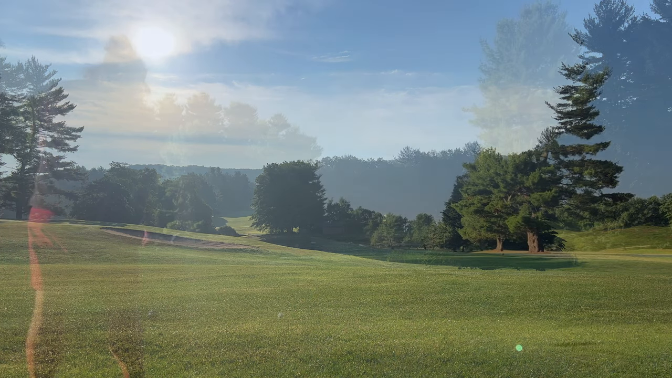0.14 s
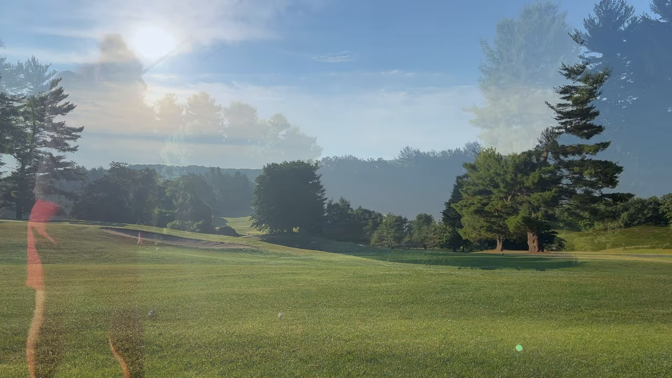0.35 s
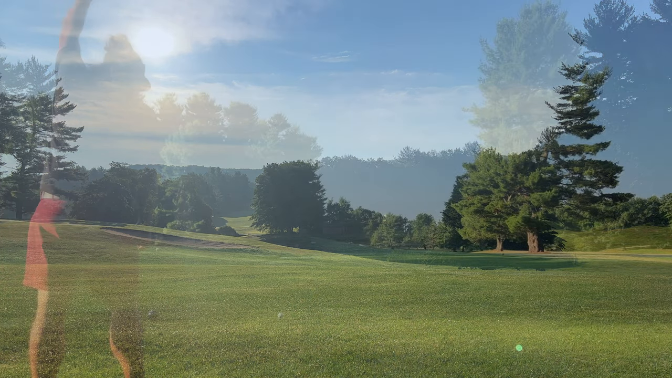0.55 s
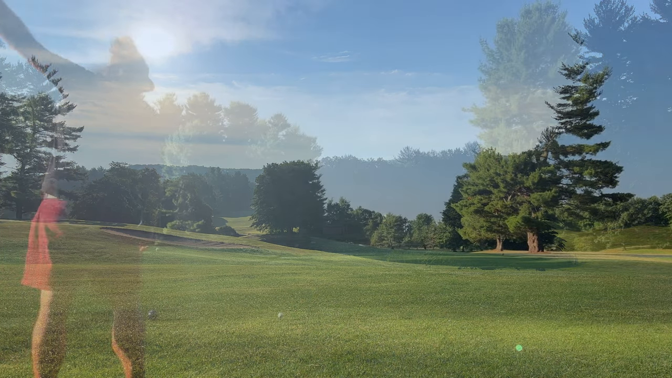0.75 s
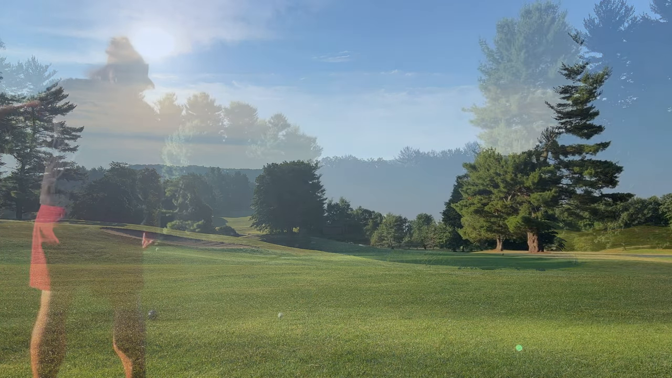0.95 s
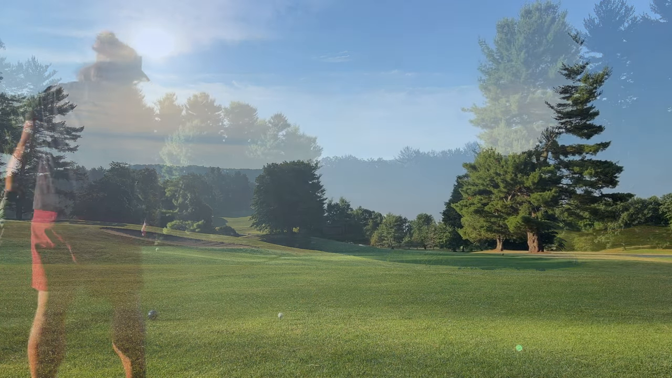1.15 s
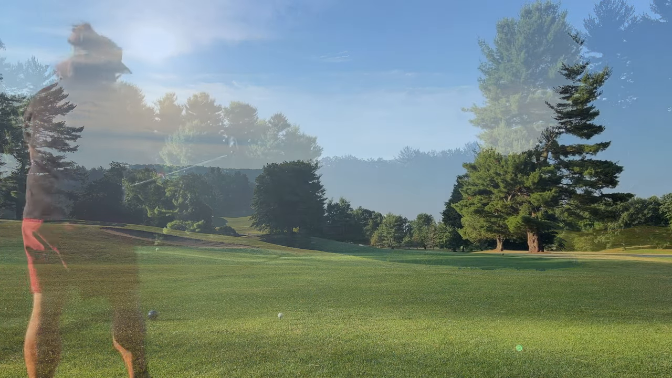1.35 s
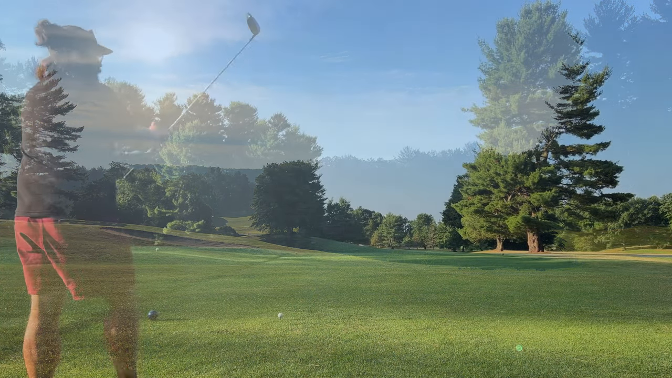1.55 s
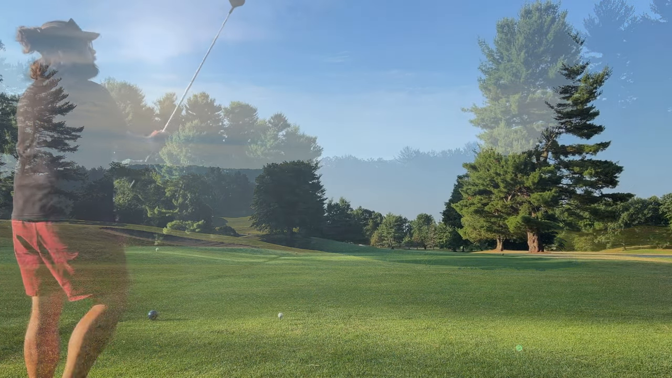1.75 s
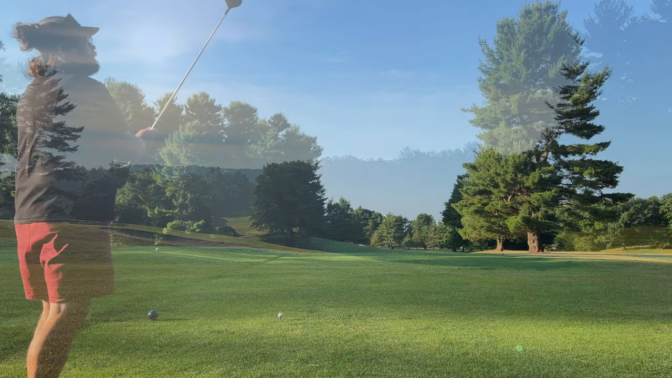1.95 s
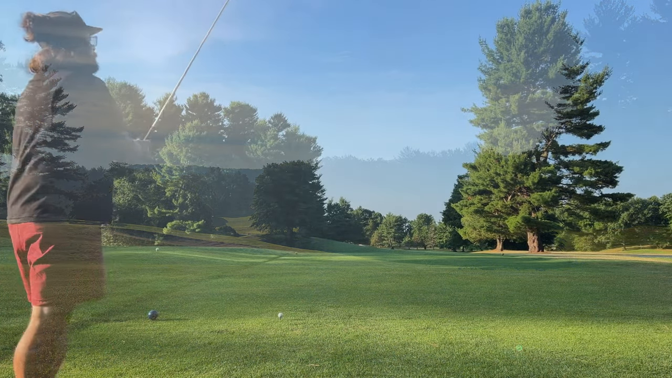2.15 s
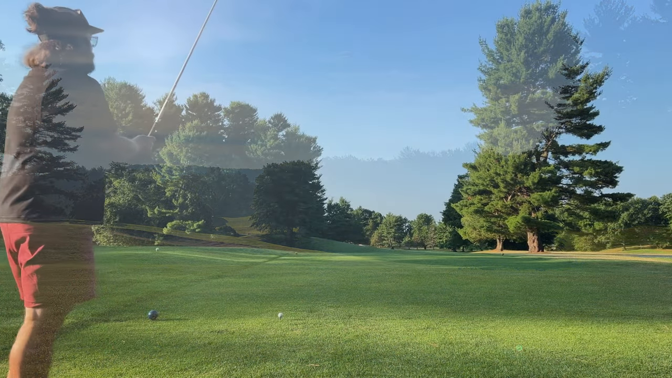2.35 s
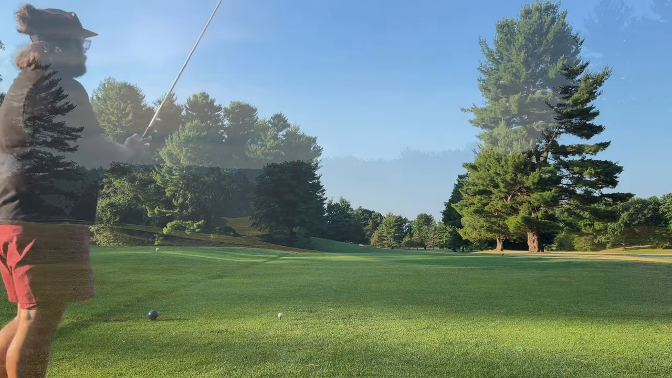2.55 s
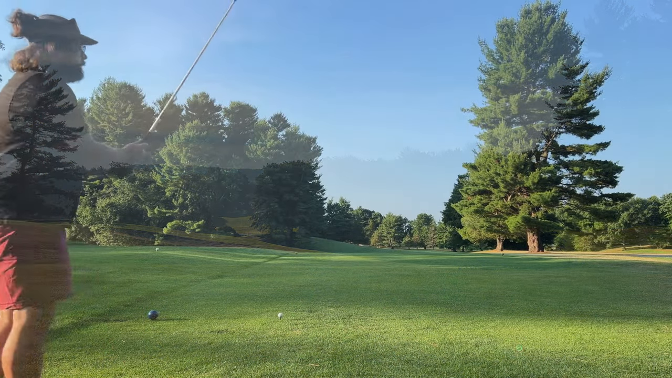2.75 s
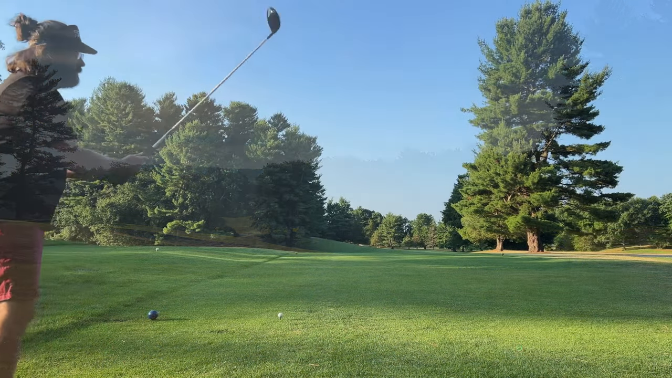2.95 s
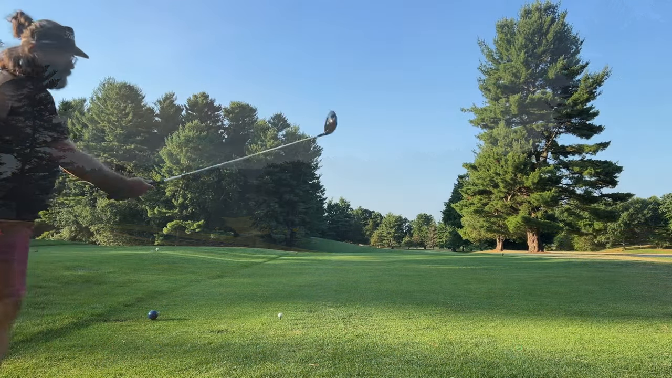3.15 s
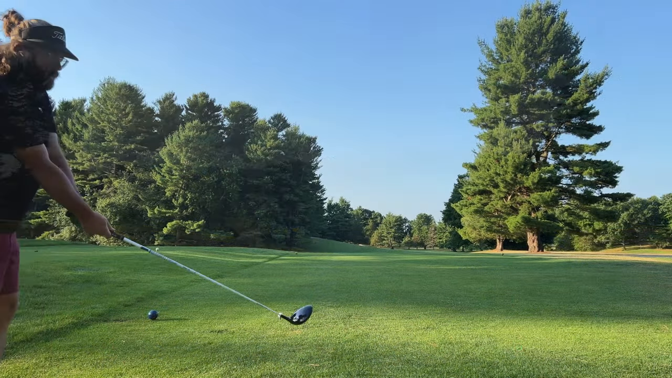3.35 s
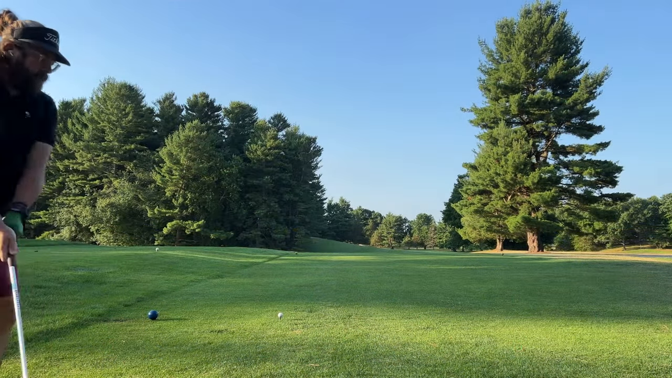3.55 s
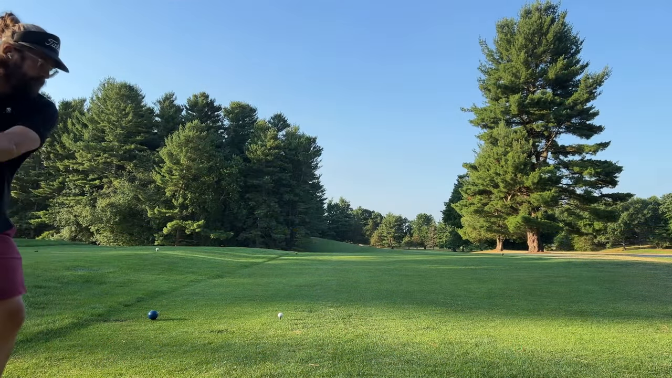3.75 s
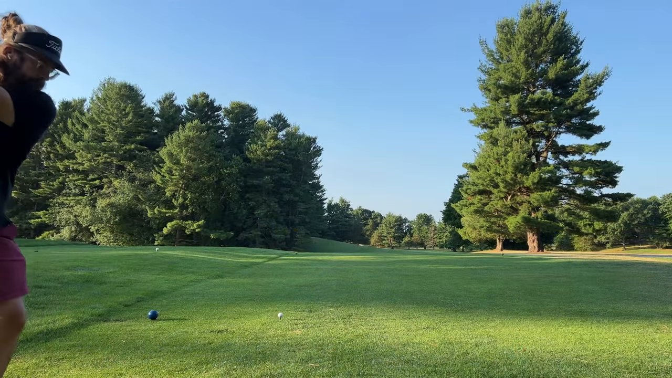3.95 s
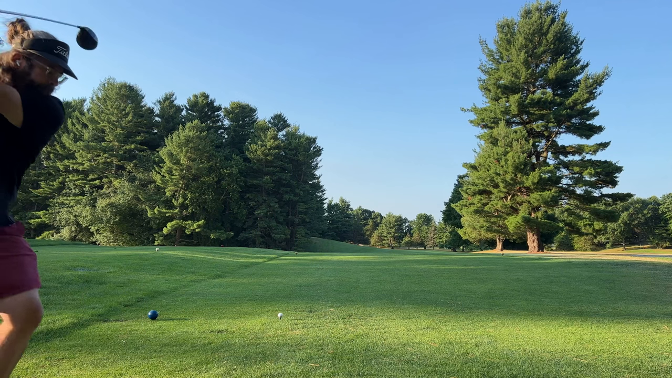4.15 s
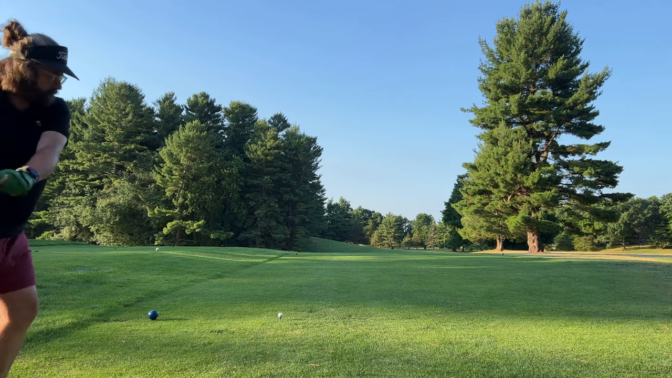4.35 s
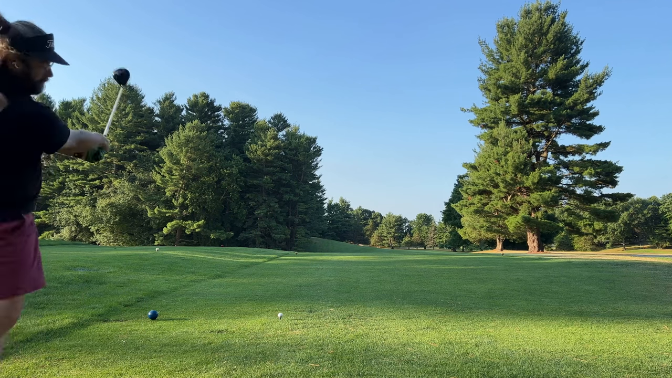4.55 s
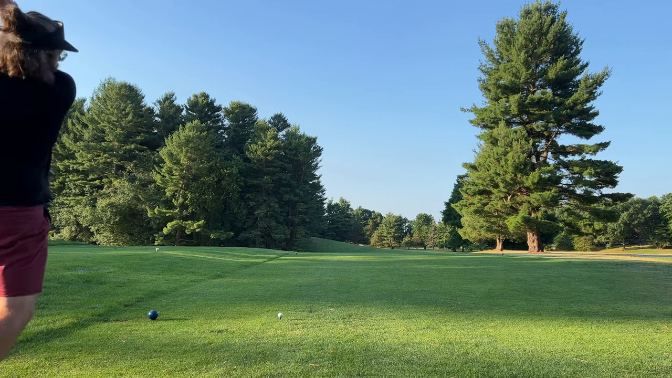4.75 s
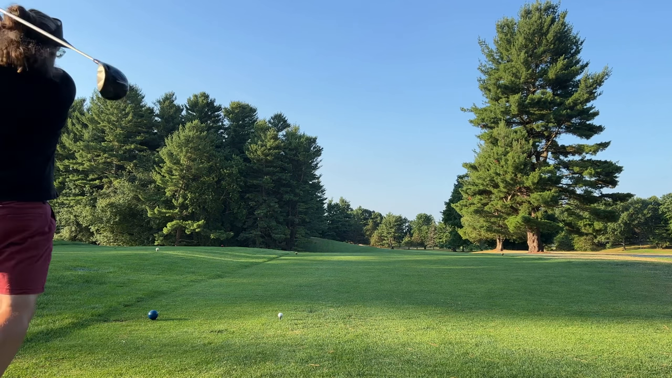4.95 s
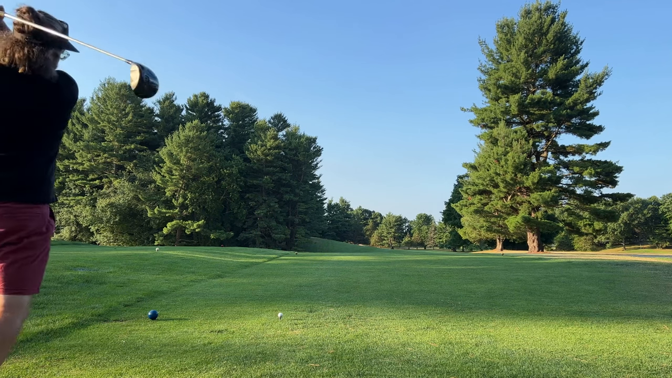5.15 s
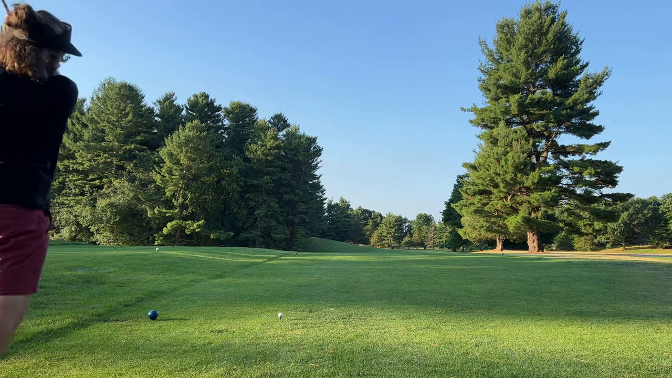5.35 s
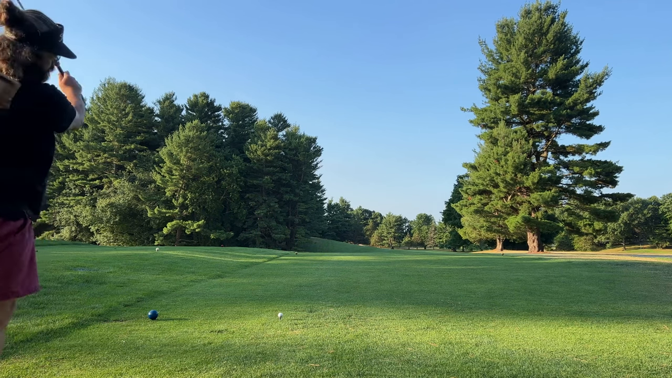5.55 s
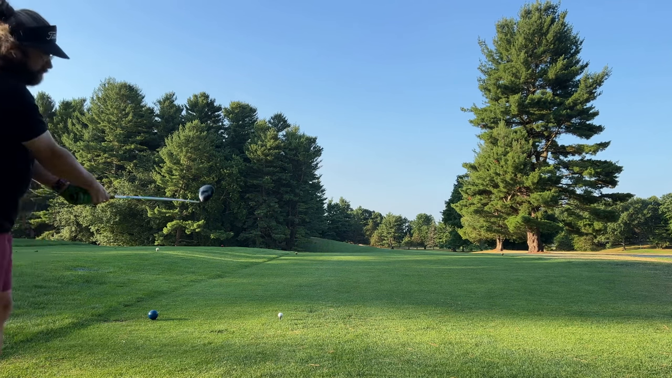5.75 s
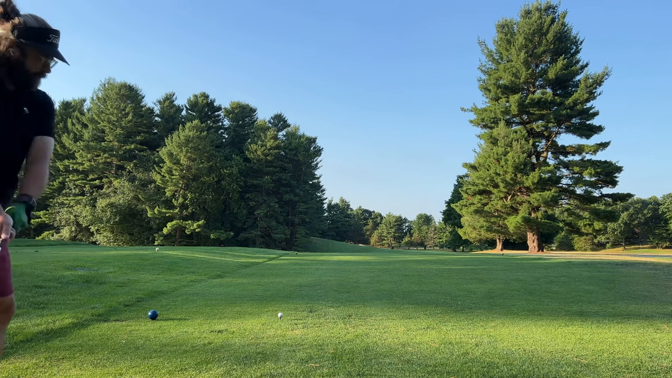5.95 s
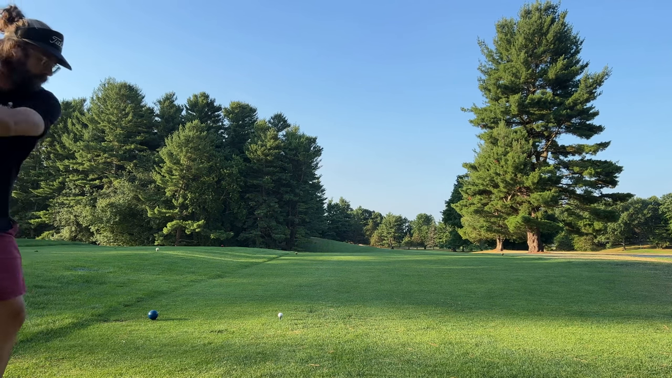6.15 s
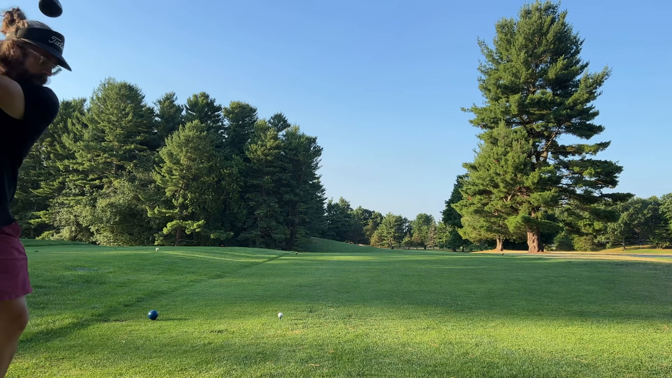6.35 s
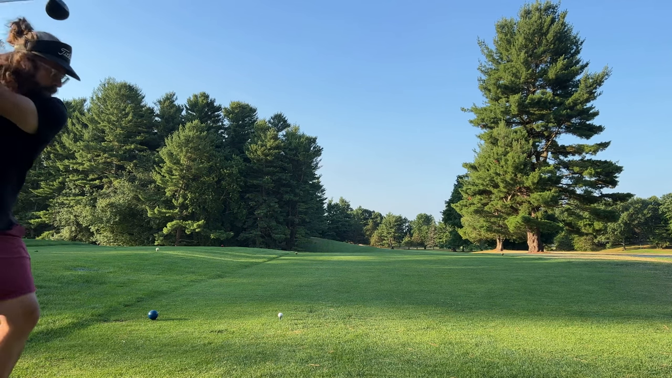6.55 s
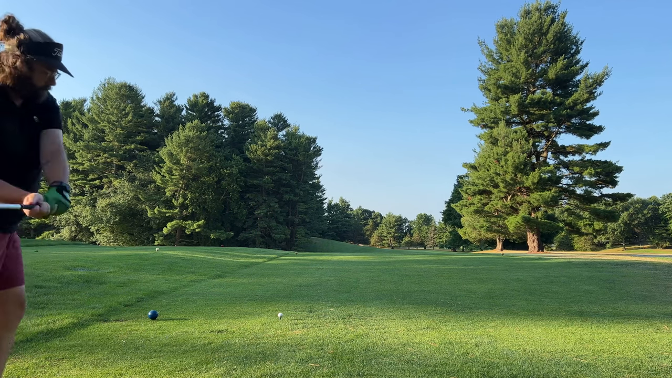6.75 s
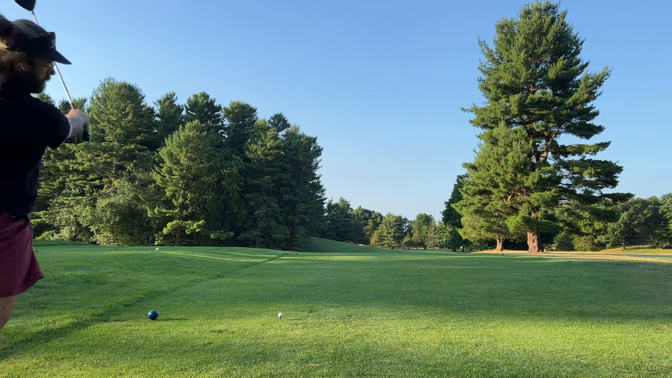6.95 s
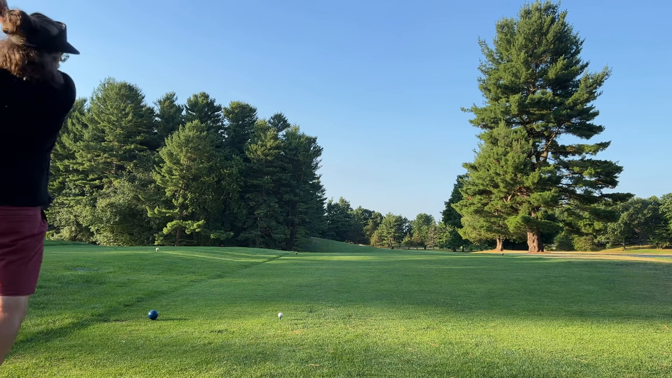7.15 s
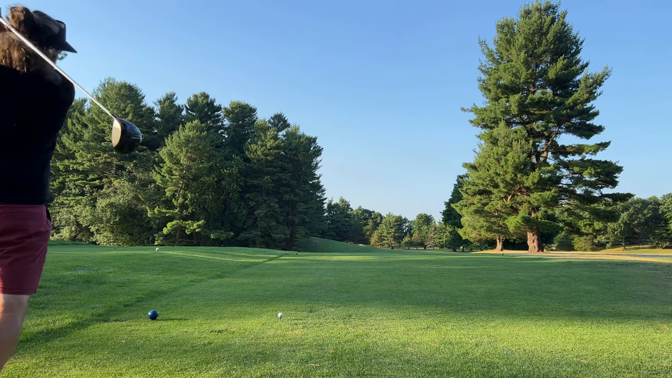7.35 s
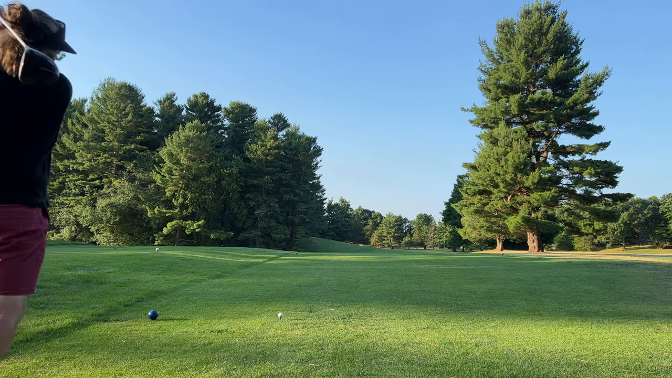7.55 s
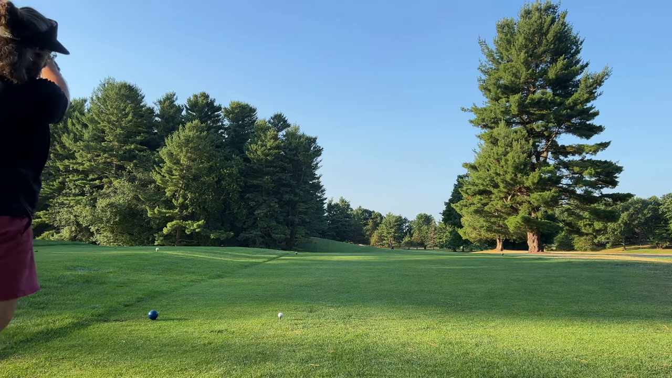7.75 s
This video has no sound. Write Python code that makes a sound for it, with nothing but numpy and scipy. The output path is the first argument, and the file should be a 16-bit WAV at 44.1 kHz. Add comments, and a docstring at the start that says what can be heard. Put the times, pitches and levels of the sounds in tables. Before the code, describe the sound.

A golf driver whooshes past twice, grazing grass hard then barely, amid low wind rumble on the microphone, small birds and insects.

```python
"""A golf driver is swung twice, a step or two left of a phone, and brushes the turf, hard and then barely.
The shaft sheds vortices whose Aeolian tone rises with its speed; the head leaves a hissing wake and whistles.
Light wind thumps on the microphone ports as short pressure pulses; cloth or shoes rustle close by.
Songbirds whistle and buzz among echoing trees, over noise bands of far traffic, leaves and insects.
A far motor hums at first as a few wavering lines and fades out."""
import sys
import numpy as np
from scipy import signal
from scipy.fft import rfft, irfft, next_fast_len
from scipy.io import wavfile
from scipy.ndimage import uniform_filter1d

SR = 44100
rng = np.random.default_rng(int(sys.argv[2]) if len(sys.argv) > 2 else 0)


def pcm_store(signal):
    """Save signal as 16-bit PCM."""
    levels = np.round(np.clip(np.atleast_2d(signal), -1, 1) * 32767)
    wavfile.write(sys.argv[1], SR, levels.astype(np.int16).T)


N = 347949
TIME = np.arange(N) / SR

# spectrum of traffic, leaves and insects: frequency_hz, relative_density_db
AIR_SPECTRUM = [(88, -20), (150, -3.5), (217, -3.5), (239, -1.5), (274, -6), (462, -9.5), (509, -9.5),
                (550, -7.5), (695, -8), (1150, -12), (1750, -19), (2500, -27), (3910, -29.5), (7130, -40.5),
                (7860, -41), (10100, -60), (15500, -60)]
# correlation of left and right in the air: frequency_hz, correlation (-1 to 1)
AIR_CORRELATION = [(60, 0.79), (130, 0.51), (290, 0.3), (640, -0.63), (1410, -0.15), (3100, 0.23),
                   (6820, -0.059), (15000, 0.88)]
# balance of the air: frequency_hz, left_minus_right_db
AIR_BALANCE = [(60, -2), (110, -4), (200, 1.5), (380, 1), (700, -0.5), (1290, 2.5), (2380, 3), (4400, 3.5),
               (8120, 4.5), (15000, -2.5)]
# low mids of the traffic: time_s, level_db
TRAFFIC_LEVEL = [(0, -52.5), (1.3, -52), (1.8, -54.5), (4.5, -54.5), (7.89, -55)]
# the traffic's rush near 1.6 kHz against its low mids: time_s, relative_db
TRAFFIC_RUSH = [(0, 2), (1, 2.5), (2.4, 2), (3.2, 1), (6.5, 0.5), (7.89, -3)]
# hiss of the leaves: time_s, level_db
LEAVES_LEVEL = [(0, -66.5), (.72, -67.5), (1.2, -67.5), (2.04, -64), (2.66, -65.5), (3.1, -70), (3.5, -73),
                (4.2, -72.5), (4.62, -62), (4.9, -69), (5.19, -71), (5.8, -64.5), (6.24, -70.5),
                (6.94, -65.5), (7.34, -73), (7.71, -72.5), (7.89, -65)]
# highest hiss against the leaves: time_s, relative_db
TOP_HISS = [(0, -11), (2.6, -20.5), (3.3, -14), (7.89, -14.5)]
TREBLE_FLICKER_DB, TREBLE_FLICKER_HZ = 1.3, 220  # fast random level flicker of the treble bands
AIR_FLICKER_DB = 1.1

# lines of the far motor: pitch_hz, width_hz, rms_level_db, fade_start_s, gone_s
MOTOR_LINES = [(113, 2.5, -45, 2.35, 3.45), (246, 2.5, -52, .35, 1.35), (494, 2, -62, .7, 1.2),
               (1980, 5, -70.5, 1.5, 2.3)]
MOTOR_WAVER_DB = 1.3

# wind on the ports: time_s, level_db
WIND_LEVEL = [(0.0, -38.5), (2.4, -38), (2.83, -38), (3.16, -42), (3.69, -52), (3.9, -47.5), (4.35, -42.5),
              (4.55, -37.5), (5.01, -42.5), (5.22, -43.5), (5.34, -29), (5.6, -34), (5.82, -44),
              (6.26, -45.5), (6.55, -41.5), (6.85, -42), (7.25, -44), (7.7, -37.5), (7.89, -40.5)]
# strongest buffets: time_s, peak_db, nominal_pitch_hz (each sinks from 1.58 to 0.74 of it)
STRONG_BUFFETS = [(2.816, -24, 98), (2.982, -29.5, 79), (3.732, -35, 66), (4.143, -33.5, 104),
                  (4.777, -39, 99), (5.116, -26.5, 81), (5.191, -25.5, 66.3), (5.288, -25, 74.5),
                  (5.328, -22.5, 119), (5.355, -16.5, 112), (5.389, -20.5, 78), (5.436, -20.5, 85.4),
                  (5.459, -20, 76), (5.516, -23, 105), (5.538, -18.5, 68.5), (5.605, -35, 191),
                  (5.631, -17, 76), (5.679, -24, 88), (5.757, -37, 108), (5.881, -30.5, 73.5),
                  (5.895, -32.5, 173), (6.021, -38, 131), (6.092, -35.5, 170), (6.309, -29, 85.5),
                  (6.326, -36.5, 220), (6.377, -36, 129), (6.522, -32, 239), (6.549, -30, 300),
                  (6.519, -31, 95), (6.577, -31, 154), (6.674, -34, 190), (6.719, -33, 108),
                  (6.811, -26, 105), (6.846, -28.5, 100), (6.872, -28, 105), (6.948, -25.5, 65),
                  (7.147, -34.5, 256), (7.265, -41, 219), (7.327, -32.5, 128), (7.364, -32, 142),
                  (7.404, -32, 65), (7.415, -35.5, 257), (7.44, -29, 151), (7.514, -28.5, 114.5),
                  (7.533, -26, 192), (7.606, -31.5, 160), (7.652, -36, 150), (7.729, -29, 109),
                  (7.764, -21.5, 176), (7.786, -26, 82)]
BUFFET_PAN_DB, WIND_PAN_DB = 1, 1.5  # left minus right

# insect chorus: time_s, level_db
CHORUS_LEVEL = [(0, -80), (3, -69.5), (5.5, -76.5), (5.66, -66), (5.95, -69), (6.15, -76), (7.89, -71.5)]
INSECT_HZ, INSECT_WIDTH_HZ = 7800, 1000

# buzzy high calls: start_s, length_s, centre_hz, peak_db, left_minus_right_db
BUZZ_CALLS = [(0.047, 0.057, 6700, -54.5, 3), (.13, 0.057, 6850, -57, 2), (0.552, .08, 7900, -59.5, 1),
              (0.562, 0.094, 8500, -63, -1), (0.726, .1, 8130, -64, 1), (0.857, 0.1, 7650, -61, 1),
              (1.446, 0.068, 7880, -59.5, 6), (1.743, 0.084, 8230, -65, 1), (2.18, 0.086, 7800, -63, -11),
              (2.265, 0.063, 6700, -56.5, 4), (2.345, .06, 6850, -58.5, 3), (2.855, 0.038, 8170, -57, 0),
              (3.062, 0.1, 7780, -68, -7), (3.223, 0.11, 7800, -69, -4), (3.775, 0.079, 7960, -60, 5),
              (4.154, 0.17, 7880, -55, 5), (4.305, 0.19, 7640, -58.5, 9), (6.413, .07, 8300, -65, 5),
              (6.72, .03, 6640, -64, 3), (6.745, .05, 8200, -64, 3), (7.384, 0.083, 7660, -64, -7),
              (7.54, .03, 7050, -64, 10), (7.56, 0.056, 7460, -60.5, 0), (7.642, 0.09, 7230, -63, 6),
              (7.713, 0.086, 6900, -65, 10), (7.801, 0.066, 7240, -65, 3)]
BUZZ_RISE, BUZZ_START_DB, BUZZ_END_DB = 0.28, -8.5, -11  # share of length to the peak; ends against it
# far whistles: start_s, length_s, from_hz, to_hz, level_db, roughness (clipped to 0-1), blur_hz
FAR_WHISTLES = [(0.24, .06, 4480, 4460, -68, 0, 130), (0.275, 0.1, 4450, 4450, -62.5, .1, 130),
                (0.79, .06, 3400, 3220, -72, .7, 250), (0.829, .05, 3180, 3080, -63, .6, 250),
                (0.863, 0.058, 3140, 2470, -59.5, .8, 300), (0.893, 0.054, 2520, 2520, -58, .3, 130),
                (0.936, 0.071, 2530, 2620, -57.5, 0.3, 130), (0.88, .05, 3000, 3100, -66, .8, 250),
                (1.01, .08, 2560, 2500, -63, .7, 250), (1.02, 0.045, 2400, 2360, -63, .6, 200),
                (1.045, 0.041, 2900, 2850, -57, .5, 200), (1.072, 0.049, 2845, 2800, -57, 0.5, 248),
                (1.375, 0.046, 3250, 3230, -67, .6, 130), (1.408, 0.021, 2250, 2120, -58.5, .4, 200),
                (1.435, .065, 2010, 2050, -63, .4, 200), (1.522, 0.058, 2830, 3010, -58.5, 0.1, 160),
                (1.561, 0.044, 2386, 2365, -59, .1, 130), (1.625, 0.039, 3220, 3160, -63, .4, 130),
                (1.966, 0.048, 2630, 2940, -58.5, .6, 250), (1.988, 0.091, 2930, 2860, -60, 1.1, 403),
                (2.044, 0.071, 3550, 3580, -59.5, .4, 200), (2.168, 0.24, 3560, 3650, -65.5, 1.1, 199),
                (2.359, 0.103, 3590, 3640, -60.5, 0.6, 198), (2.264, 0.071, 2150, 2090, -66, .4, 130),
                (2.372, 0.048, 2370, 2370, -65, 0.3, 130), (2.439, 0.155, 4410, 4460, -64.5, 0.14, 130),
                (2.45, 0.16, 3570, 3360, -66, 1, 450), (2.1, .35, 3640, 3810, -68, 1, 500),
                (4.21, 0.062, 5860, 8000, -60.5, 0.9, 500), (4.318, 0.085, 2610, 2480, -60.5, 0.05, 130),
                (4.527, 0.074, 3040, 2830, -62, 0.6, 298), (7.003, .047, 4450, 4450, -69, 0, 130),
                (7.072, 0.11, 4450, 4480, -70, 0.03, 130), (7.342, 0.084, 3540, 3300, -66, 0.05, 130)]
FAR_PAN_DB, FAR_FADE_DB = 2, -1  # left minus right; from +1 dB at the start to -1 dB at the end
# calls of a bird on the left: start_s, length_s, from_hz, to_hz, level_db,
# bend (1 an even slide, more holds the pitch and slides late)
CLEAR_CALLS = [(1.3, .14, 4150, 4450, -75, 1), (1.425, .09, 4450, 4680, -69, 1.05),
               (1.495, 0.11, 4630, 5100, -64, 0.66), (1.6, 0.087, 5120, 5300, -73, 0.92),
               (1.695, .09, 5250, 5440, -69, 1.3), (3.243, 0.048, 4820, 3130, -62, 0.75),
               (3.265, 0.028, 6700, 5400, -67, 1), (3.394, 0.048, 4220, 4390, -60.5, 0.67),
               (3.433, 0.033, 4420, 3910, -54.5, 1.8), (3.445, 0.036, 4330, 4380, -61, 1),
               (3.562, 0.041, 4200, 3070, -55.5, 1.24), (3.578, .022, 7650, 6250, -70, 1.3),
               (3.65, .028, 4950, 5300, -72, 1.5), (5.149, 0.033, 4820, 3430, -55, 0.85),
               (5.162, 0.03, 7450, 6000, -61, 1), (5.163, 0.035, 3450, 2450, -61, 0.88),
               (5.29, 0.068, 4204, 4310, -52, 0.52), (5.342, 0.032, 4360, 3840, -52, 1.14),
               (5.436, 0.064, 4460, 3030, -57, 1.06), (5.456, 0.038, 7750, 6040, -65, 1.6),
               (5.58, .02, 7000, 6300, -70, 0.91), (5.563, 0.043, 4200, 2800, -54, 1.2),
               (6.945, 0.044, 4350, 3400, -62.5, 0.45)]
CLEAR_ROUGH, CLEAR_PAN_DB = 0.12, 11.5
# one gurgling phrase of a near bird: time_s, pitch_hz, level_db, warble_depth_hz
NEAR_PHRASE = [(7.415, 2510, -58, 1), (7.424, 3320, -52, 0), (7.432, 2910, -56, 0), (7.442, 3130, -51.5, 0),
               (7.472, 3040, -48, -5), (7.494, 2785, -44, -17), (7.5, 3080, -47, 186),
               (7.535, 3630, -57.5, 188), (7.545, 3810, -56, 30), (7.575, 3980, -71, 30),
               (7.61, 3600, -57, 58), (7.63, 3480, -56, 54), (7.71, 3430, -58, 52), (7.745, 3600, -62, 55)]
PHRASE_ROUGH, PHRASE_PAN_DB, WARBLE_HZ = 0.1, 3.5, 62.2
BIRD_BLUR_HZ = 127.6  # noise width in the nearer birds' whistles
FAR_ECHO_DB, CLEAR_ECHO_DB, PHRASE_ECHO_DB = 6, 3, -3.5  # relative sends: far birds stir more echo

# broad rustles close by, cloth or shoes: centre_s, length_s, level_db
RUSTLE_PUFFS = [(1.849, 0.073, -56.5), (2.978, 0.055, -61), (3.69, .003, -60), (5.819, 0.26, -58),
                (7.192, 0.0033, -59), (7.865, 0.0013, -42), (7.877, 0.0037, -53.5)]
# spectrum of a rustle: frequency_hz, relative_density_db
RUSTLE_SPECTRUM = [(1200, -6), (2500, -3), (4000, 0.5), (6000, -5), (9000, -8.5), (15500, -38)]

# each swing, pitch following the speed of the shaft: time_s, tip_shedding_hz, tip_tone_db, slower_sections_db
SWING_CURVES = [
    [(4.36, 268.5, -66, -68), (4.39, 334.4, -45, -58), (4.415, 450, -39.5, -45), (4.428, 520, -36, -43),
     (4.436, 583, -21.5, -40), (4.442, 586, -26.5, -37), (4.448, 585, -25, -35), (4.457, 612, -36, -36),
     (4.468, 727, -25, -33), (4.478, 686, -30.5, -29), (4.488, 655, -25, -33), (4.497, 566, -34, -31),
     (4.512, 517, -31, -36), (4.525, 563, -29.5, -32), (4.555, 448, -40, -42.5), (4.575, 390, -51, -46),
     (4.61, 288, -62, -51)],
    [(6.74, 294.5, -60, -56), (6.772, 390.6, -54, -55), (6.785, 421, -39, -50), (6.799, 459, -34, -41),
     (6.808, 491, -28, -38), (6.818, 523, -31, -42), (6.832, 580, -28, -37), (6.85, 646, -28, -34),
     (6.862, 640, -26, -43), (6.872, 585, -32, -41), (6.879, 537, -29, -41), (6.89, 608, -28.5, -39),
     (6.9, 673, -37, -39), (6.91, 598, -43, -39), (6.935, 503, -42, -54), (6.97, 340, -57, -56)],
]
# slower sections of the shaft, tip to grip: share_of_tip_pitch, relative_db, width_hz
SHAFT_SECTIONS = [(.84, -2, 150), (.64, -2, 150), (0.45, -7, 120), (0.28, -9, 90)]
# head passes the ground in each swing: time_s
BOTTOM_TIMES = (4.505, 6.88)
# shedding starts to lose its lock in each swing: time_s
UNLOCK_TIMES = (4.5, 6.903)
UNLOCK_S, UNLOCK_DB = .012, -10  # time it takes; level of the locked tone after it
SLIP_DB, SLIP_WIDTH_HZ = -7, 170  # the unlocked part of the tip's tone
# the right port lags less as the head crosses: lag_ms, and the matching time_s around the bottom
PORT_LAGS = (0.35, .05)
CROSSING_TIMES = (-0.057, 0.019)
# wake hiss at its loudest in each swing: time_s, relative_db
WAKE_PEAKS = [(4.49, -38.5), (6.854, -41)]
# spectrum of the wake: frequency_hz, relative_density_db
WAKE_SPECTRUM = [(530, -3.5), (800, 4.5), (990, -5), (1200, -5), (1690, -13), (2900, -15), (3150, -13.5),
                 (6930, -15.5), (7440, -12), (9560, -19), (12300, -27), (15600, -31)]
HISS_RISE_DB_PER_S, HISS_FALL_DB_PER_S = 178, 154
FLUTTER_DB, FLUTTER_HZ = 1.2, 170  # the hiss comes in uneven flaps
GROUND_MS, RISE_MS_PER_S, AFTER_MS_PER_S = 0.27, 6, 3.6  # echo lag at the bottom; growth before, after
# brief rising whistles of the head's cavities: start_s, length_s, from_hz, to_hz, level_db
CAVITY_WHISTLES = [(4.395, .03, 6500, 7460, -53), (4.508, .03, 7500, 8400, -48),
                   (6.762, .04, 3200, 4400, -63), (6.81, .088, 3200, 6800, -57),
                   (6.828, .03, 5200, 7200, -56), (6.846, .026, 7000, 7150, -54),
                   (6.884, 0.025, 8100, 9000, -49), (6.904, 0.052, 6000, 7300, -56)]
HEAD_ROUGH, HEAD_BLUR_HZ = 0.78, 448
# the sole brushes the turf: time_s, relative_grass_db, thud_peak_db
TURF_BRUSHES = [(4.5, -24, -16), (6.884, -46, -52)]
# grass spectrum shared by both sides: frequency_hz, relative_density_db
GRASS_SPECTRUM = [(500, -12), (1000, -0.5), (2310, -16.5), (2560, -15), (3220, -15), (3650, -20.5),
                  (6710, -12.5), (7700, -4.5), (8440, -11), (9360, -9.5), (15500, -18)]
# grass spectrum that differs left and right: frequency_hz, relative_density_db
GRASS_SIDE_SPECTRUM = [(590, -32), (1000, 5), (4920, 0), (7880, -5), (9500, -18), (12000, -10),
                       (15500, -13)]

TOP_HZ = 15650  # upper limit of the phone
OPPOSED = np.array([[1], [-1]])  # opposite signs on left and right


def undb(db):
    """Level as an amplitude ratio."""
    return 10 ** (np.asarray(db) / 20)


def unit(x):
    """Normalise to rms 1."""
    return x / np.sqrt(np.mean(x ** 2))


def at_hz(table, hz):
    """Interpolate a (frequency_hz, value) table on a log-frequency axis."""
    f, v = np.transpose(table)
    return np.interp(np.log(np.maximum(hz, 1)), np.log(f), v)


def curve(table):
    """Interpolate a (time_s, value) table at every sample."""
    return np.interp(TIME, *np.transpose(table))


def spread(table):
    """First sample of a curve, and its columns interpolated at every sample."""
    s, *columns = np.transpose(table)
    i = int(s[0] * SR)
    return i, [np.interp(TIME[i:int(s[-1] * SR)], s, c) for c in columns]


def coloured(table, size):
    """Spectral shaping: noise of rms 1 with the spectrum of a (frequency_hz, db) table."""
    hz = np.arange(size // 2 + 1) * SR / size
    return unit(irfft(rfft(rng.standard_normal(size)) * undb(at_hz(table, hz)), size))


def walk(rate, size=N):
    """Slow random modulation: levels held 1 / rate s and slewed twice; spread near 1."""
    k = max(int(SR / rate), 1)
    held = np.repeat(rng.standard_normal(size // k + 1), k)
    return 1.47 * uniform_filter1d(uniform_filter1d(held, k), k)[:size]


def narrow(hz, width_hz):
    """Narrow-band noise: a moving tone of rms 1 whose amplitude and phase wander."""
    turn = 2 * np.pi * np.cumsum(hz) / SR
    return unit(walk(width_hz, len(hz)) * np.cos(turn) + walk(width_hz, len(hz)) * np.sin(turn))


def pan(x, db):
    """Place by level difference, left minus right."""
    return x * undb(np.array([db, -db]).reshape(2, -1) / 2)


def late(x, ms):
    """Propagation delay by a moving time."""
    n = np.arange(x.shape[-1])
    return np.array([np.interp(n - ms * SR / 1000, n, row) for row in np.atleast_2d(x)])


def add(out, x, i):
    """Superpose x on out from sample i on."""
    a, b = max(i, 0), np.clip(i + x.shape[-1], 0, N)
    out[:, a:b] += x[..., a - i:b - i]


def whistle(hz, db, rough, blur_hz, pan_db):
    """Partial coherence: a soft-ended sine mixed with narrow noise by its roughness."""
    share = np.clip(rough, 0, 1)
    sine = np.sqrt(2 - 2 * share) * np.sin(2 * np.pi * np.cumsum(hz) / SR)
    tone = sine + np.sqrt(share) * narrow(hz, blur_hz)
    ends = signal.windows.tukey(len(hz), min(1400 / len(hz), .8))
    return pan(undb(db) * ends * tone, pan_db)


def thump(hz, cycles, fall, skew=0.):
    """Damped pressure pulse sinking in pitch; the ports differ in phase by skew; peak 1."""
    u = np.arange(int(3 * cycles / hz * SR)) * hz / SR / cycles
    turn = 2 * np.pi * np.cumsum(hz * (1 + fall * np.exp(-2.2 * u))) / SR
    x = u * np.exp(-2.5 * u) * np.sin(turn + np.array([[skew], [-skew]]) / 2)
    return x / np.abs(x).max()


def air():
    """Diffuse noise: half-octave bands swell with their neighbours and flicker alone."""
    swells = [curve(TRAFFIC_LEVEL), curve(LEAVES_LEVEL), curve(LEAVES_LEVEL) + curve(TOP_HISS)]
    size = next_fast_len(N)
    hz = np.arange(size // 2 + 1) * SR / size
    # mid and side noise in proportions that set the correlation of the two sides
    alike = np.clip(at_hz(AIR_CORRELATION, hz), -.95, .95)
    mid, side = (rfft(rng.standard_normal(size)) * np.sqrt(1 + sign * alike) for sign in (1, -1))
    balance = at_hz(AIR_BALANCE, hz) / 2
    shape = undb(at_hz(AIR_SPECTRUM, hz)) * np.array([(mid + side) * undb(balance), (mid - side) * undb(-balance)])
    # rms of the mean of both sides in the band that each swell refers to
    power = np.abs(shape) ** 2
    scale_db = []
    for lo, hi in ((500, 1800), (4700, 6200), (10500, 13500)):
        inside = (hz > lo) & (hz < hi)
        total = power[:, inside].mean(0).sum() * (1 + alike[inside].mean())
        scale_db.append(20 * np.log10(np.sqrt(total) / size))
    place = 2 * np.log2(np.maximum(hz, 1) / 150)  # half-octaves above 150 Hz
    out = 0
    for k in range(15):
        centre = 150 * 2 ** (k / 2)
        # blend of swells: 0 traffic, 1 leaves, 2 highest hiss
        which = np.interp(np.log(centre), np.log([2040, 5780, 7850, 10800]), [0, 0.88, 1.9, 2.1])
        low = min(int(which), 1)
        db = (1 - which + low) * (swells[low] - scale_db[low])
        db = db + (which - low) * (swells[low + 1] - scale_db[low + 1])
        db = db + curve(TRAFFIC_RUSH) * np.exp(-np.log2(centre / 1600) ** 2 / 0.65)
        flicker_db = AIR_FLICKER_DB * walk(11)
        treble_flicker_db = min(which, 1) * TREBLE_FLICKER_DB * walk(TREBLE_FLICKER_HZ)
        band = irfft(shape * np.maximum(1 - np.abs(place - k), 0), size)[:, :N]
        out = out + band * undb(db + flicker_db + treble_flicker_db - 1.36)
    return out


def motor():
    """Line spectrum: a few tones waver in pitch and level, and fade away."""
    out = 0
    for hz, width, db, fade, gone in MOTOR_LINES:
        waver = undb(MOTOR_WAVER_DB * walk(2 * width))
        turn = 2 * np.pi * np.cumsum(hz + width * walk(2 * width)) / SR
        out = out + undb(db) * waver * np.sqrt(2) * np.sin(turn) * np.interp(TIME, [fade, gone], [1, 0])
    return out


def wind():
    """Pressure pulses on the ports: a dense random stream follows the gusts; the strongest come singly."""
    out, stream = np.zeros((2, N)), np.zeros((2, N))
    for when, pitch, size, side, sign in rng.random((1100, 5)):
        x = thump(33 * 2 ** (1.7 * pitch), 1.71, 1.056, 0.72 + 1.0 * (side - .5))
        level = undb(7.0 * pitch - 1.8 * np.log(size + 0.0012))  # many weak, few strong
        add(stream, x * level * np.sign(sign - .5), int(when * (N + 4096)) - 4096)
    for (s, db, hz), sign in zip(STRONG_BUFFETS, rng.random(len(STRONG_BUFFETS))):
        x = undb(db) * np.sign(sign - .5) * thump(0.74 * hz, 1.04, 1.14, 0.98)
        add(out, pan(x, BUFFET_PAN_DB), int((s + 0.00485) * SR))
    return out + pan(undb(curve(WIND_LEVEL)) * unit(stream), WIND_PAN_DB)


def insects():
    """Narrow-band chorus: independent noise on each side flickers, drifts and swells."""
    sides = []
    for _ in range(2):
        level = undb(curve(CHORUS_LEVEL) + 2.6 * walk(15) + 1.8 * walk(60))
        sides.append(level * narrow(INSECT_HZ * (1 + 0.0078 * walk(3.0)), INSECT_WIDTH_HZ))
    return np.array(sides)


def buzzing_birds():
    """Trills too fast to resolve smear into a band: narrow noise under a rise and fall."""
    out = np.zeros((2, N))
    for s, length, hz, db, pan_db in BUZZ_CALLS:
        u = np.linspace(0, 1, int(length * SR))
        swell_db = np.interp(u, [0, BUZZ_RISE, 1], [BUZZ_START_DB, 0, BUZZ_END_DB])
        shape = undb(db + swell_db) * signal.windows.tukey(len(u), .4)
        band = narrow(np.full(len(u), 1. * hz), 1000. if hz < 7100 else 320.)
        add(out, pan(shape * band, pan_db), int(s * SR))
    return out


def far_birds():
    """Gliding sines lose coherence with distance, blurring into narrow noise."""
    out = np.zeros((2, N))
    for s, length, from_hz, to_hz, db, rough, blur_hz in FAR_WHISTLES:
        u = np.linspace(0, 1, int(length * SR))
        hz = from_hz + (to_hz - from_hz) * u
        add(out, whistle(hz, db + FAR_FADE_DB * (2 * u - 1), rough, blur_hz, FAR_PAN_DB), int(s * SR))
    return out


def clear_bird():
    """Nearly pure gliding tones on the left."""
    out = np.zeros((2, N))
    for s, length, from_hz, to_hz, db, bend in CLEAR_CALLS:
        u = np.linspace(0, 1, int(length * SR))
        hz = from_hz + (to_hz - from_hz) * u ** bend
        add(out, whistle(hz, db, CLEAR_ROUGH, BIRD_BLUR_HZ, CLEAR_PAN_DB), int(s * SR))
    return out


def near_bird():
    """Frequency modulation: a fast warble makes one phrase gurgle."""
    out = np.zeros((2, N))
    i, (hz, db, depth_hz) = spread(NEAR_PHRASE)
    hz = hz + depth_hz * np.sin(2 * np.pi * WARBLE_HZ * TIME[:len(hz)])
    add(out, whistle(hz, db, PHRASE_ROUGH, BIRD_BLUR_HZ, PHRASE_PAN_DB), i)
    return out


def birds():
    """Reverberation: the trees scatter the calls into decaying noise, by convolution."""
    clear, far, near = buzzing_birds() + clear_bird(), far_birds(), near_bird()
    t = TIME[:SR // 2]
    # falls 60 dB in 0.5 s, after a 12 ms gap
    trees = rng.standard_normal((2, len(t))) * np.exp(-np.log(1000) * t / 0.5) * (t > .012)
    sent = undb(FAR_ECHO_DB) * far + undb(CLEAR_ECHO_DB) * clear + undb(PHRASE_ECHO_DB) * near
    return far + clear + near + undb(-40) * signal.fftconvolve(sent, trees, axes=1)[:, :N]


def rustles():
    """Friction noise: bell-shaped puffs of grainy hiss."""
    out = np.zeros((2, N))
    t = np.arange(-SR // 2, SR // 2) / SR
    for s, length, db in RUSTLE_PUFFS:
        puff = np.exp(-(t / length) ** 2) * undb(db + 1.8 * walk(300, len(t)))
        hiss = np.array([coloured(RUSTLE_SPECTRUM, len(t)) for _ in range(2)])
        add(out, pan(puff * hiss, 2.0), int(s * SR) - SR // 2)
    return out


def shaft_tones():
    """Aeolian tone: vortex shedding follows speed, locked then slipping at the tip, lower toward the grip."""
    out = np.zeros((2, N))
    for swing, bottom, unlock in zip(SWING_CURVES, BOTTOM_TIMES, UNLOCK_TIMES):
        i, (hz, tone_db, slower_db) = spread(swing)
        n = len(hz)
        t = TIME[i:i + n]
        turn = 2 * np.pi * np.cumsum(hz * (1 + 0.03 * walk(110, n))) / SR
        lock = undb(np.interp(t - unlock, [0, UNLOCK_S], [-1, UNLOCK_DB]))
        locked = lock * np.sqrt(2) * np.sin(turn)
        slipping = undb(SLIP_DB) * narrow(hz, SLIP_WIDTH_HZ)
        # drag tone at the octave, grows with the lift
        overtones = np.sin(2 * turn) + undb(-4) * np.sin(3 * turn)
        drag = undb(-29.0) * narrow(2 * hz, 300.) + undb(1.49 * tone_db + 23.0) * overtones
        slower = sum(undb(db) * narrow(share * hz, width) for share, db, width in SHAFT_SECTIONS)
        left = undb(tone_db) * (locked + drag + slipping) + undb(slower_db) * slower
        right = late(left, np.interp(t - bottom, CROSSING_TIMES, PORT_LAGS))[0]
        add(out, pan(np.array([left, right]), .3), i)
    return out


def wake_hiss():
    """Turbulent wake of the head: broadband noise combed by its ground echo, teeth rising on the way down."""
    out = np.zeros((2, N))
    for swing, bottom, (loudest, hiss_db) in zip(SWING_CURVES, BOTTOM_TIMES, WAKE_PEAKS):
        i, (hz, *_) = spread(swing)
        n = len(hz)
        t = TIME[i:i + n]
        since, past = t - bottom, t - loudest
        shared, own = coloured(WAKE_SPECTRUM, n), coloured(WAKE_SPECTRUM, n)
        swell_db = hiss_db + np.minimum(HISS_RISE_DB_PER_S * past, -HISS_FALL_DB_PER_S * past)
        hiss = undb(swell_db + FLUTTER_DB * walk(FLUTTER_HZ, n)) * (shared + 0.78 * own * OPPOSED)
        ground_ms = GROUND_MS + np.maximum(-RISE_MS_PER_S * since, AFTER_MS_PER_S * since)
        add(out, pan(hiss + 0.09 * late(hiss, ground_ms), 3.0), i)
    return out


def head_whistles():
    """Cavity resonance: openings in the head whistle briefly, rising and rough."""
    out = np.zeros((2, N))
    for s, length, from_hz, to_hz, db in CAVITY_WHISTLES:
        hz = np.linspace(from_hz, to_hz, int(length * SR))
        add(out, whistle(hz, db, HEAD_ROUGH, HEAD_BLUR_HZ, 2.5), int(s * SR))
    return out


def turf_brush():
    """Impact and friction: a low thud under a grainy burst of cut grass."""
    out = np.zeros((2, N))
    t = np.arange(4096) / SR - .02
    # blades are cut within some ms, torn bits patter after
    cut = np.exp(-(t - .001) ** 2 / (2 * 0.0046 ** 2))
    patter = undb(-8.5) * np.exp(-np.maximum(t, 0) / .016) * np.clip(t / 0.002, 0, 1)
    for s, grass_db, thud_db in TURF_BRUSHES:
        grain = undb(1.1 * walk(810, 4096))
        grass = coloured(GRASS_SPECTRUM, 4096) + 0.59 * coloured(GRASS_SIDE_SPECTRUM, 4096) * OPPOSED
        add(out, undb(grass_db) * pan((cut + patter) * grain * grass, 0.75), int((s - .02) * SR))
        add(out, -undb(thud_db) * thump(109.5, 1.0, 7.46), int((s - .003) * SR))
    return out


def scene():
    """Superposition of all sources."""
    club = shaft_tones() + wake_hiss() + head_whistles() + turf_brush()
    return air() + motor() + wind() + insects() + birds() + rustles() + club


def record(dry):
    """Band limiting: the phone cuts the deepest bass and the top."""
    dry = signal.sosfilt(signal.butter(2, 38., "high", fs=SR, output="sos"), dry)
    return signal.sosfilt(signal.ellip(12, .3, 90, TOP_HZ, fs=SR, output="sos"), dry)


dry = scene()
out = record(dry)
pcm_store(out)
```